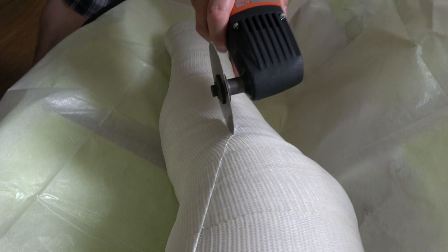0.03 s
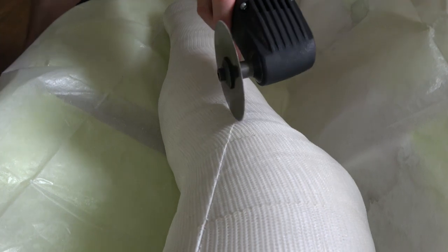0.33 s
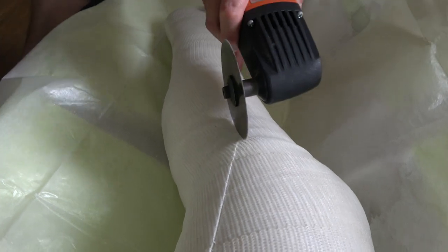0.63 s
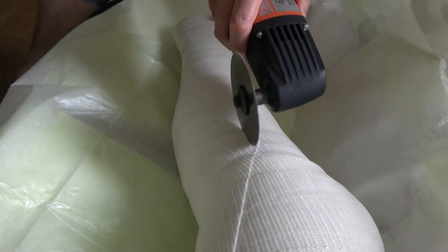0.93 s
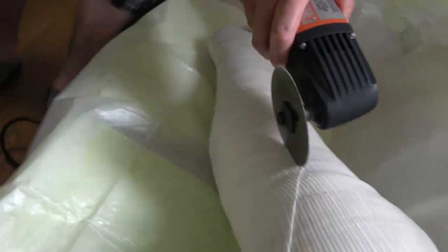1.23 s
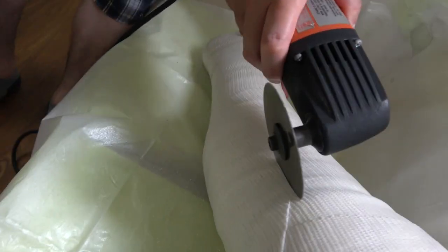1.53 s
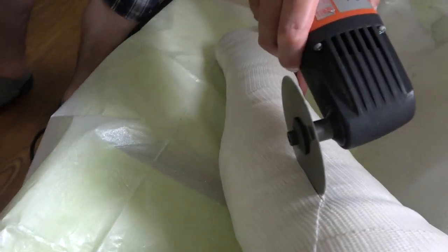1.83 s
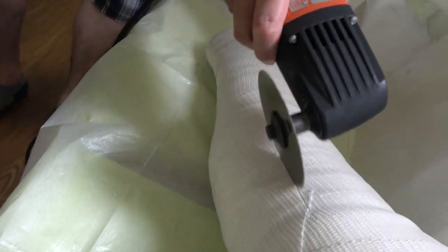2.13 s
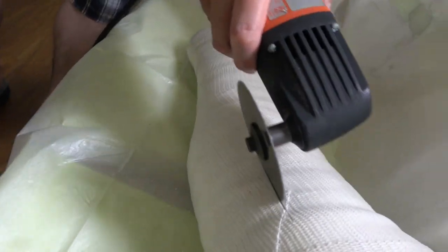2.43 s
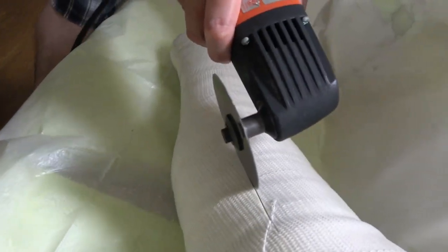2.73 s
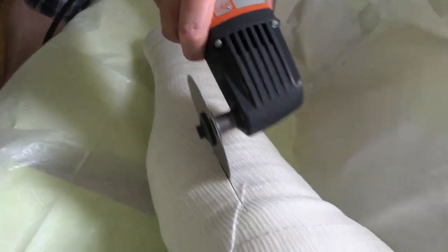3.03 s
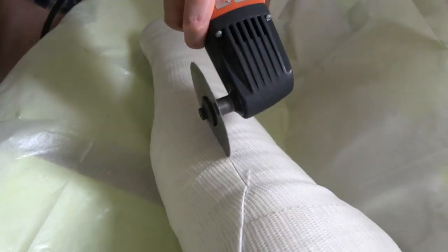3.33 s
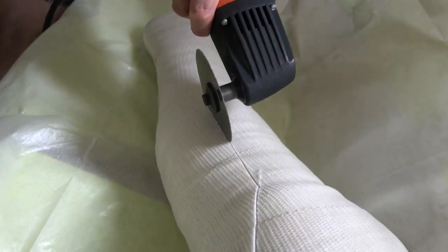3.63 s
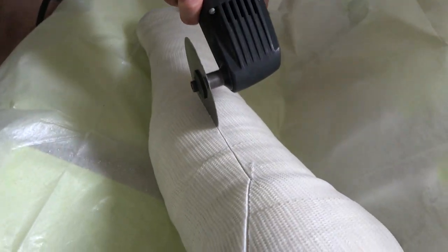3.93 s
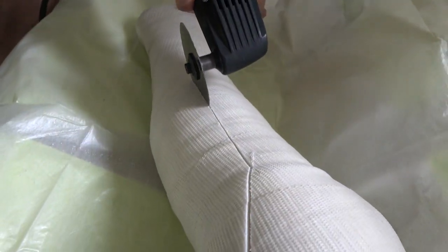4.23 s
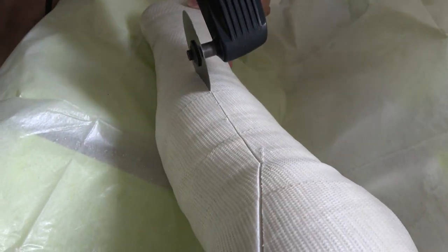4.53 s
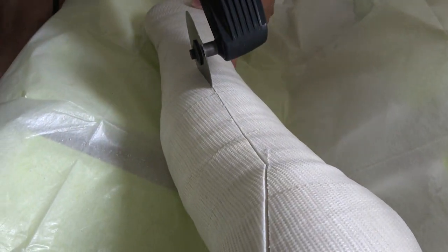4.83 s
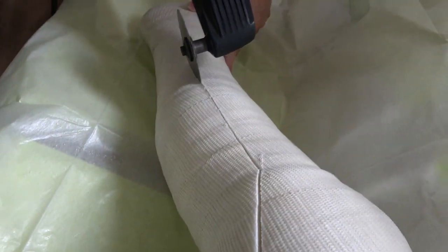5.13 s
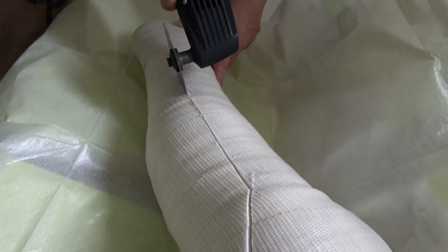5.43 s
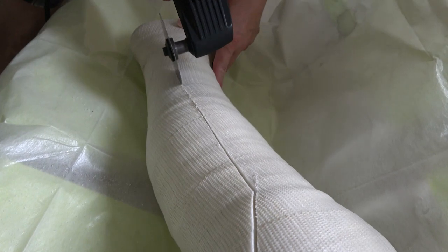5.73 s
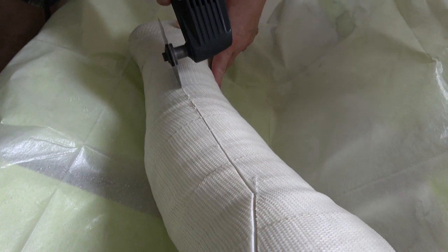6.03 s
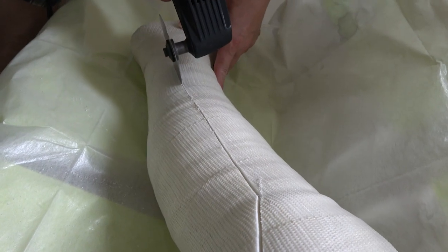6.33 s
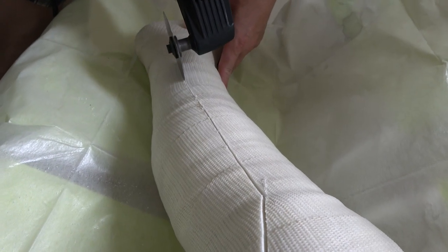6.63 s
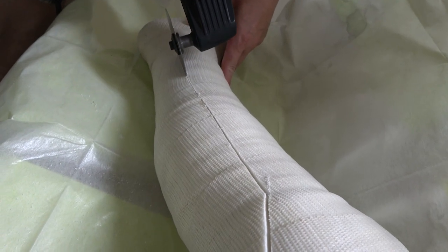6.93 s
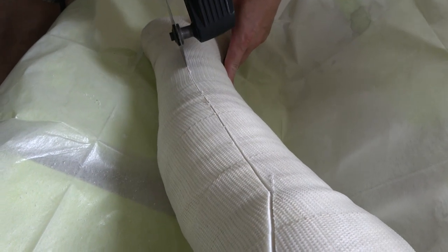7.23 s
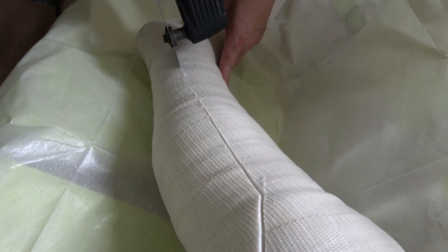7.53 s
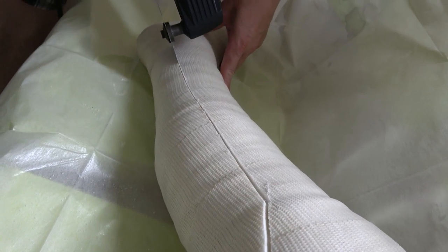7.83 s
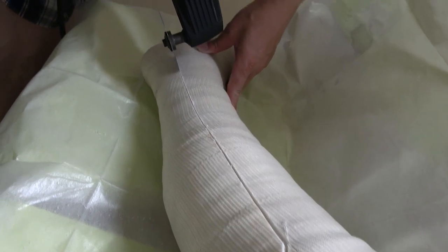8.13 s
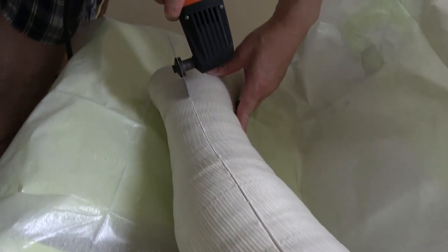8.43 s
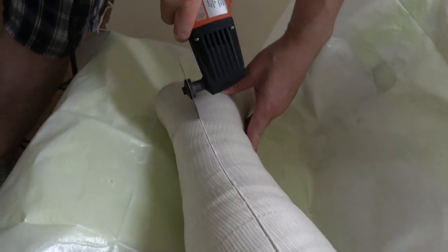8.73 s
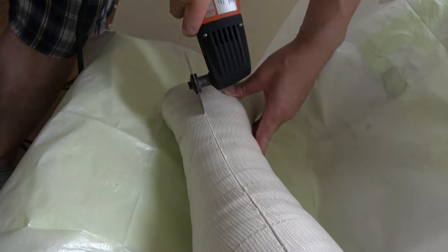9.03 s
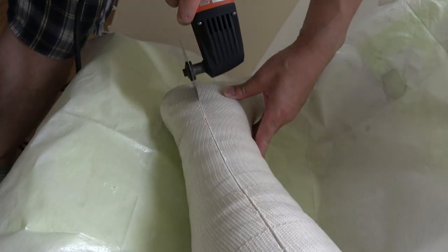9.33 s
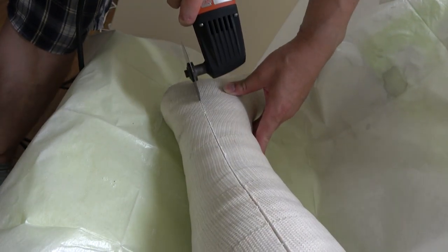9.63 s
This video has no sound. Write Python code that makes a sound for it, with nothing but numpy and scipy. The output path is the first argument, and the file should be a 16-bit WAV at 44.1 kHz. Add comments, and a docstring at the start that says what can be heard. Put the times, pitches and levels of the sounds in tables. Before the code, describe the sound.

An electric oscillating saw starts abruptly and cuts a hollow plaster cast throughout, close by in a small room with little echo. Its buzzing hum blends with a dry, gritty rasp, a thin motor whine and a steady fan hiss. The pitch drops over the first two seconds as the blade is pressed in, lifts briefly, then sinks slowly. Short, high squeals come often during the first four seconds as the blade binds, with slight slips around 1.4 and 2.5 seconds. From about 3 seconds the hum grows fuller and stronger. Softer, longer squeals return from about 6 seconds, and the buzz gradually turns rough and chattering as the blade skips. A brief, bright scrape comes at 8.6 seconds, followed by a few more squeals. The motor speeds up a little and is still cutting at about 10 seconds.

```python
"""A buzzing hum and a dry rasp start at once: an electric oscillating saw cuts a hollow plaster cast,
close by in a small room. The swinging blade forces the cast to vibrate, knocks in the slot several
times a stroke and rubs off plaster. Gear and brushes whine, the fan hisses, and the motor slows as it
is pressed in. The blade squeals where it binds, scrapes where it slips, and late in the cut skips on
every second stroke."""
import sys
import numpy as np
from scipy import signal
from scipy.fft import rfft, irfft, next_fast_len
from scipy.io import wavfile
from scipy.ndimage import uniform_filter1d

SR = 44100
rng = np.random.default_rng(int(sys.argv[2]) if len(sys.argv) > 2 else 0)


def store_wav(level_fs):
    """Save 16-bit WAV to argv[1]."""
    pcm = np.round(np.clip(np.atleast_2d(level_fs), -1, 1) * 32767)
    wavfile.write(sys.argv[1], SR, pcm.T.astype(np.int16))


N = 436149
TIME = np.arange(N) / SR
TORQUE_PULSE = np.sin(2 * np.pi * 100 * TIME)  # motor torque pulses at twice the mains frequency


def undb(db):
    """Decibels to amplitude ratio."""
    return 10 ** (np.asarray(db) / 20)


def curves(table):
    """Linear interpolation of each column over time."""
    time_s, *columns = np.transpose(table)
    return [np.interp(TIME, time_s, column) for column in columns]


def steady(x, size=4001):
    """Normalisation to a running rms of 1."""
    return x / np.sqrt(uniform_filter1d(x * x, size) + 1e-12)


def walk(rate_hz):
    """Slow random modulation: held values, smoothed twice, with a spread near 1."""
    hold = max(int(SR / rate_hz), 2)
    held = np.repeat(rng.standard_normal(N // hold + 2), hold)
    return np.sqrt(2) * uniform_filter1d(uniform_filter1d(held, hold), hold)[:N]


def peak(hz, centre_hz, width_hz):
    """Lorentzian resonance curve, 1 at the centre."""
    return 1 / (1 + (2 * (hz - centre_hz) / width_hz) ** 2)


def resonate(x, hz, width_hz):
    """Second-order resonator, gain 1 at its centre."""
    return signal.lfilter(*signal.iirpeak(hz, hz / width_hz, fs=SR), x)


def colour(x, outline, size=4096):
    """Minimum-phase filter from rows of frequency_hz, gain_db."""
    bins_hz = np.maximum(np.fft.rfftfreq(size, 1 / SR), 1)
    hz, db = np.transpose(outline)
    gain = undb(np.interp(np.log(bins_hz), np.log(hz), db))
    cepstrum = irfft(np.log(gain))
    cepstrum[1:size // 2] *= 2
    cepstrum[size // 2 + 1:] = 0
    return signal.oaconvolve(x, irfft(np.exp(rfft(cepstrum))))[:N]


def clicks(at, heights, size=6):
    """Band-limited impulses at fractional sample positions."""
    index = np.floor(at).astype(int)[:, None] + np.arange(1 - size, size + 1)
    offset = index - at[:, None]
    shape = heights[:, None] * np.sinc(offset) * np.sinc(offset / size)
    return np.bincount(np.clip(index, 0, N).ravel(), shape.ravel(), N + 1)[:N]


def arrivals(turns, targets, jitter_ms):
    """Sample positions where the stroke phase reaches each target, with timing jitter."""
    jitter = jitter_ms * SR / 1000 * rng.standard_normal(len(targets))
    return np.interp(targets, turns, np.arange(N)) + jitter


# Motor speed under load: time_s, stroke_hz
STROKE_RATE = [(0.07, 267.2), (1.02, 241.3), (1.27, 237.4), (1.68, 226), (2.15, 230.4), (2.5, 239.7),
               (2.78, 235), (3.38, 222.8), (3.82, 216.5), (4.53, 218.1), (4.77, 216.1), (5.21, 217.6),
               (5.92, 214), (6.5, 212.9), (6.8, 209.4), (7.07, 211.8), (7.4, 209), (8.17, 210),
               (8.52, 210.5), (9.89, 230.9)]


def motor():
    """Load slows the motor; phase, one turn a stroke, is the integral of its wavering rate."""
    stroke_hz = curves(STROKE_RATE)[0]
    turns = np.cumsum(stroke_hz * (1 + 0.000703 * walk(30))) / SR
    return stroke_hz, turns


# How firmly the slot holds the blade: time_s, grip_fraction
SLOT_GRIP = [(.07, 0.21), (.42, 0.17), (.6, .38), (.75, 0.23), (1.7, 0.32), (2.1, 0.25), (2.87, 0.33),
             (3.05, .2), (3.25, 0.68), (4.3, 0.67), (4.9, 0.98), (5.3, 0.63), (5.55, 1), (7.4, 0.96),
             (7.75, 0.64), (8.5, 0.98), (9, 0.62), (9.89, 0.42)]


def slot_grip():
    """Mechanical coupling: a firmer grip passes more of the stroke to the cast."""
    return curves(SLOT_GRIP)[0]


# Resonances of the hollow cast: centre_hz, width_hz, level_db
CAST_MODES = [(433.7, 26.7, -35), (526, 83, -37.5), (626.3, 15, -32.5), (652.8, 22, -30.5),
              (711, 28, -41.5), (768, 41, -28), (870, 9.6, -43.5), (947, 58, -33.5), (1066, 16.5, -31),
              (1103.5, 49, -32.5), (1175, 113, -32), (1315, 21, -29.5), (1500, 130, -35.5)]
# Drive of the stroke's overtones: time_s, even_gain_db, odd_gain_db
OVERTONE_DRIVE = [(.07, 0, -4.5), (.7, -0.5, -4), (1.65, -4.5, 3), (2.05, -10, -5), (2.4, 3, 4.5),
                  (2.8, -0.5, -0.5), (3.25, 1, -1), (3.7, -1.5, -0.5), (4.9, -1.5, 2), (5.25, 2.5, -1),
                  (6.1, -1, 0.5), (6.9, -0.5, 1.5), (7.85, -3, -1.5), (8.03, -8.5, -13), (8.45, -7, -3),
                  (8.75, -2.5, -3), (9.03, -3.5, -9), (9.4, 6.5, 3.5), (9.89, 1, -1)]


def cast_hum(turns, stroke_hz, grip, skip):
    """Forced vibration: the cast follows the stroke, and its modes pick out passing harmonics."""
    sway = undb((1.4 + (1 - grip) ** 2) * walk(14))  # a loose blade shakes the cast unevenly
    hum = undb(-17.5) * grip * sway * (1 + 0.023 * TORQUE_PULSE) * np.sin(2 * np.pi * turns)
    drive_db = curves(OVERTONE_DRIVE)
    for k in range(2, 7):
        response = sum(undb(db) * peak(k * stroke_hz, hz, width) for hz, width, db in CAST_MODES)
        drive = undb(drive_db[k % 2] + 2.16 * walk(24))
        phase = 2 * np.pi * (k * turns + rng.random()) + 0.3 * walk(20)
        hum += response * drive * np.sin(phase)
    # skipping doubles the period, which adds faint half-order tones
    halves = sum(undb(2 * walk(25)) * np.sin(2 * np.pi * k * turns + .5 * walk(6.1)) for k in (.5, 2.5))
    return np.sqrt(2) * (hum + undb(-35.5) * skip ** 2 * halves)


# Spectrum of the variation in stroke force: frequency_hz, gain_db
FORCE_SPECTRUM = [(10, 3.5), (60, 1), (110, -1), (150, -6.5), (220, -20), (600, -22)]


def rumble(turns, grip, skip):
    """Amplitude modulation: no two strokes push equally hard, so noise sidebands flank the hum."""
    force = colour(rng.standard_normal(N), FORCE_SPECTRUM)
    sidebands = steady(force * np.sin(2 * np.pi * turns), size=12001)
    return undb(-36.5 + 4 * skip) * grip ** 0.59 * sidebands


def gear(turns, stroke_hz, teeth=31):
    """Tooth meshing makes a whine that grows with speed and swells at a housing resonance."""
    speed_db = 0.6931 * (stroke_hz - 226)
    housing_db = 20.5 * peak(teeth * stroke_hz, centre_hz=6720, width_hz=63)
    level = undb(-53.5 + speed_db + housing_db + 2.2 * walk(25))
    return np.sqrt(2) * level * np.sin(2 * np.pi * teeth * turns + 0.5 * walk(50))


def brushes(turns, bars=24):
    """Periodic contact of brushes and commutator bars makes a thin whine that comes and goes."""
    level = undb(-44 + 3.6 * walk(2.9) + 2.1 * walk(30))
    return np.sqrt(2) * level * np.sin(2 * np.pi * bars * turns + 0.099 * walk(36))


# Spectrum of the air in the vents: frequency_hz, gain_db
AIR_SPECTRUM = [(1000, -23.5), (4000, 2.5), (8200, 0), (8900, -7.5), (15000, -24)]


def cooling_air():
    """Flow noise: the motor fan blows a smooth hiss through the vents."""
    return undb(-31) * steady(colour(rng.standard_normal(N), AIR_SPECTRUM))


def grit(turns, swing_depth, grain_db):
    """Brittle fracture: plaster crumbles in tiny grains, a little louder on the forward swing."""
    swing = np.cos(2 * np.pi * turns) + 0.18 * np.cos(4 * np.pi * turns)
    pressure = np.exp(swing_depth * swing + 0.018 * TORQUE_PULSE)
    return rng.standard_normal(N) * pressure * undb(grain_db * walk(1500) + 0.9 * walk(45))


# Friction on the blade's flank: time_s, level_db
RUB_LEVEL = [(.07, -35.5), (.4, -30.5), (1.34, -30.5), (1.52, -37.5), (2.1, -32), (2.3, -30), (3.3, -33.5),
             (4.5, -31), (6.2, -36), (6.62, -41), (6.8, -36.5), (7.8, -32), (8.1, -36.5), (8.4, -37),
             (8.56, -29.5), (9.89, -31)]
# Response of the cast to rubbing: frequency_hz, gain_db
RUB_SPECTRUM = [(30, -40), (100, -17.5), (340, -13.5), (500, 2), (800, 1), (1150, 6.5), (1450, 0.5),
                (2200, -19), (5000, -40)]


def rubbing(turns, scrape_db):
    """Sliding friction of the blade's flank in the slot draws a dull noise from the cast."""
    level = undb(curves(RUB_LEVEL)[0] + 1.27 * walk(8) + 0.33 * scrape_db)
    return level * steady(colour(grit(turns, swing_depth=0.056, grain_db=3), RUB_SPECTRUM))


def knocks(turns, skip, count=5, drift_hz=4):
    """Impact excitation: the blade hits the slot at a few slowly drifting points of each stroke."""
    stroke = np.arange(1, int(turns[-1]))
    onset = np.searchsorted(turns, stroke)
    hits = np.zeros(N)
    for k in range(count):
        place = (k / count) ** 1.4 + 0.0357 * walk(drift_hz)[onset]
        at = arrivals(turns, stroke + place, jitter_ms=0.012)
        force = undb(-1.3 * k + 0.71 * walk(drift_hz)[onset])
        alternation = 1 + skip[onset] * (-1) ** (stroke + k)
        hits += clicks(at, force * alternation)
    return hits


def disperse(x, spread_ms, corner_hz):
    """Dispersion: bending waves in steel run faster at high pitch, so each knock becomes a chirp."""
    size = next_fast_len(N + 4096)
    hz = np.fft.rfftfreq(size, 1 / SR)
    delay_s = spread_ms / 1000 / np.sqrt(1 + hz / corner_hz)
    phase = -2 * np.pi * np.cumsum(delay_s) * hz[1]
    return irfft(rfft(x, size) * np.exp(1j * phase), size)[:N]


# Resonances of blade and housing, relative to their excitation: centre_hz, width_hz, gain_db
BLADE_MODES = [(1965, 99, -3), (2190, 180, -6), (2560, 260, -10), (3234, 74, -8), (4560, 110, -34),
               (4840, 190, -9), (5870, 250, -9), (7390, 160, -3), (9360, 180, -3.5), (10160, 210, -3.5)]


def blade(x, sway_db, sway_hz):
    """Modal ringing: the slot damps now one mode, now another, so each swells and fades on its own."""
    ringing = np.zeros(N)
    for hz, width_hz, db in BLADE_MODES:
        sway = np.clip(walk(sway_hz), -2, 1.4)
        ringing += undb(db + sway_db * sway) * resonate(x, hz, width_hz)
    return steady(x + ringing)


# How hard the teeth cut, before each band's offset: time_s, middle_db, treble_db
TOOTH_BITE = [(0.1, -23, -23), (0.56, -23.5, -21.5), (1.49, -19, -22), (1.57, -24.5, -20.5),
              (2.31, -19, -24), (2.72, -22.5, -21.5), (3.29, -23, -21.5), (4.92, -25, -26),
              (5.28, -22, -23), (5.5, -23, -28), (6.18, -27, -27), (7.05, -23.5, -27.5),
              (7.35, -26.5, -27.5), (7.65, -24, -25), (8.55, -23.5, -28), (8.61, -23, -27),
              (9.84, -22, -24), (9.89, -17, -26)]
# Weight of loose crumbling against clean knocks: time_s, gain_db
CRUMBLE_GAIN = [(0, -2), (1.2, -4), (1.5, -11), (2.2, -3.5), (3.3, -6), (4.4, -1.5), (8.3, -3.5), (8.7, 2),
                (9.4, -2.5)]
# Spectra of the middle, treble and top bands of the cut: frequency_hz, gain_db
KNOCK_SPECTRUM = [(300, -79), (900, -11.5), (1250, 0.5), (1550, -0.5), (2000, -0.5), (2500, 1.5),
                  (3000, -5), (3400, -2.5), (4000, -9), (6000, -18), (15000, -32.5)]
RASP_SPECTRUM = [(1000, -39), (2500, -0.5), (3700, -3.5), (4400, 0), (5800, -5), (6600, -8.5),
                 (8000, -13.5), (9500, -22), (15000, -37)]
SIZZLE_SPECTRUM = [(4000, -26), (7000, -21), (8600, 9.5), (9250, 12.5), (9700, 8), (10400, 7), (11200, 4),
                   (11900, -4), (12900, 2), (14000, -4), (15800, -40.5)]


def cutting(turns, skip, scrape_db):
    """Source and filter: knocks and crumbling excite the housing (middle) and steel blade (bright)."""
    middle_db, treble_db = np.array(curves(TOOTH_BITE)) + .6 * walk(9)  # the teeth bite unevenly
    chirps = disperse(knocks(turns, skip), spread_ms=6, corner_hz=2559)
    hits = blade(chirps, sway_db=7.5, sway_hz=16)
    crumbs = grit(turns, swing_depth=0.019, grain_db=2.5)
    grains = undb(curves(CRUMBLE_GAIN)[0]) * blade(crumbs, sway_db=3.5, sway_hz=14)
    knock_db = middle_db - 1.5 + 0.27 * scrape_db + 0.47 * walk(14)
    rasp_db = treble_db - 1 + 0.7 * scrape_db + 0.77 * walk(12)
    sizzle_db = treble_db - 5.5 + scrape_db
    knock = undb(knock_db) * steady(colour(hits + undb(2.5) * grains, KNOCK_SPECTRUM))
    rasp = undb(rasp_db) * steady(colour(hits + undb(6) * grains, RASP_SPECTRUM))
    sizzle = undb(sizzle_db) * steady(colour(grains + undb(-5.5) * hits, SIZZLE_SPECTRUM))
    return knock + rasp + sizzle


# The blade binds in the slot: start_s, end_s, pitch_hz, level_db
BINDS = [(0.088, 0.186, 2680, -25), (0.212, 0.335, 9200, -27.5), (0.41, 0.553, 9300, -29),
         (0.438, 0.54, 3600, -26.5), (0.65, 0.76, 1580, -30), (0.763, 0.97, 1925, -26.5),
         (1.155, 1.3, 3260, -26.5), (1.36, 1.523, 3250, -22), (1.531, 1.648, 2070, -28),
         (1.547, 2.037, 5640, -27), (1.643, 1.76, 1780, -30), (1.743, 1.876, 3120, -28),
         (1.938, 2.13, 10190, -29), (2.277, 2.365, 1170, -24.5), (2.27, 2.37, 2870, -28),
         (2.373, 2.438, 3320, -25), (2.586, 2.947, 5040, -25), (2.7, 2.925, 2750, -26.5),
         (3.2, 3.62, 3315, -26.5), (3.6, 4.0, 3260, -32.5), (3.253, 3.502, 2032, -31),
         (5.867, 6.699, 2566, -32), (6.552, 6.805, 1970, -30.5), (6.93, 7.848, 2297, -28.5),
         (7.3, 8.153, 2060, -30.5), (7.896, 8.293, 2460, -28.5), (8.15, 8.458, 3142, -29.5),
         (8.697, 8.92, 2320, -28.5), (9.03, 9.196, 2510, -25), (9.684, 9.88, 2392, -26)]


def squeals(turns, relative_width=.08, fade_s=0.017):
    """Resonance under periodic drive: a binding blade is plucked once a stroke and one mode rings."""
    stroke = np.arange(1, int(turns[-1]))
    at = arrivals(turns, stroke, jitter_ms=0.014)
    plucks = clicks(at, undb(1.5 * rng.standard_normal(len(stroke))))
    flutter = undb(1.8 * walk(55))
    out = np.zeros(N)
    for start_s, end_s, hz, db in BINDS:
        span = (TIME > start_s - fade_s) & (TIME < end_s + fade_s)
        inside_s = np.minimum(TIME[span] - start_s, end_s - TIME[span])
        envelope = np.clip(0.5 + 0.5 * inside_s / fade_s, 0, 1)
        width_hz = relative_width * hz
        ring = flutter[span] * resonate(resonate(plucks[span], hz, width_hz), hz, width_hz)
        out[span] += undb(db) * envelope * ring / np.std(ring)
    return out


# The blade slips free: centre_s, half_length_s, grip_lost_fraction, scrape_db
BLADE_SLIPS = [(1.443, 0.072, 0.55, -0.5), (2.381, 0.047, 0.29, 0.5), (2.62, 0.076, 0.35, 0.5),
               (8.629, 0.032, 0.8, 7.5), (9.284, 0.08, 0.6, 1.5)]


def slipping():
    """Brief decoupling: each slip loosens the grip and shifts the scraping level in a Gaussian pulse."""
    grip_lost, scrape_db = np.zeros((2, N))
    for centre_s, half_length_s, fraction, db in BLADE_SLIPS:
        pulse = np.exp(-((TIME - centre_s) / half_length_s) ** 2)
        grip_lost += fraction * pulse
        scrape_db += db * pulse
    return np.clip(grip_lost, 0, .95), scrape_db


# Alternation between strong and weak strokes: time_s, depth_fraction
SKIP_DEPTH = [(4.4, .05), (6.3, 0.23), (8.3, 0.47), (8.7, 0.32), (9.4, 0.75)]


def skipping():
    """Period doubling: late in the cut the blade skips on every second stroke."""
    return curves(SKIP_DEPTH)[0]


# Stereo balance of the saw: frequency_hz, left_minus_right_db
BALANCE = [(60, -4), (220, -2.5), (600, -1.6), (1200, -0.6), (2500, 0.1), (5000, 0), (12000, -1)]


def direct_sound(saw):
    """Level difference between channels: the hand-held saw sits slightly right and leans to and fro."""
    lean_db = walk(2.435)
    channels = []
    for side in (1, -1):
        outline = [(hz, side * db / 2) for hz, db in BALANCE]
        channels.append(undb(side * lean_db / 2) * colour(saw, outline))
    return np.array(channels)


# Radiation toward the walls: frequency_hz, gain_db
WALL_SPECTRUM = [(40, 8.5), (200, -12), (400, 0), (1100, 1.5), (2500, -9), (3700, -17), (5000, -2.5),
                 (9000, 4.5), (13000, -5.5)]


def room(x, t60_s, wet_db, size=16384):
    """Reverberation: dense reflections decay exponentially, independently in each channel."""
    t = np.arange(size) / SR
    tails = rng.standard_normal((2, size)) * undb(-60 * t / t60_s) * (t > .002)
    tails *= undb(wet_db) / np.sqrt(np.sum(tails ** 2, axis=1, keepdims=True))
    radiated = colour(x, WALL_SPECTRUM)
    return np.array([signal.oaconvolve(radiated, tail)[:N] for tail in tails])


def scene(start_s=.069, rise_s=.0024):
    """Superposition: the saw's sources add, and all but the cast's hum reverberate."""
    stroke_hz, turns = motor()
    grip, skip = slot_grip(), skipping()
    grip_lost, scrape_db = slipping()
    running = np.clip((TIME - start_s) / rise_s, 0, 1)
    hum = running * cast_hum(turns, stroke_hz, grip * (1 - grip_lost), skip)
    machine = rumble(turns, grip, skip) + gear(turns, stroke_hz) + brushes(turns) + cooling_air()
    slot = rubbing(turns, scrape_db) + cutting(turns, skip, scrape_db) + squeals(turns)
    saw = running * (machine + slot)
    return direct_sound(hum + saw) + room(saw, t60_s=.1, wet_db=-10.5)


def record(dry, ceiling=0.62, cutoff_hz=15800):
    """Soft saturation rounds the highest peaks, and a low-pass filter cuts the top."""
    rounded = dry / (1 + (dry / ceiling) ** 4) ** (1 / 4)
    return signal.sosfilt(signal.ellip(10, .1, 80, cutoff_hz, fs=SR, output="sos"), rounded)


dry = scene()
out = record(dry)
store_wav(out)
```